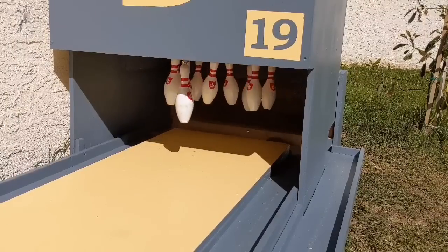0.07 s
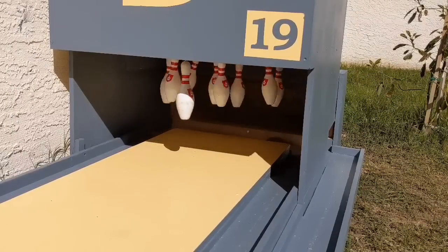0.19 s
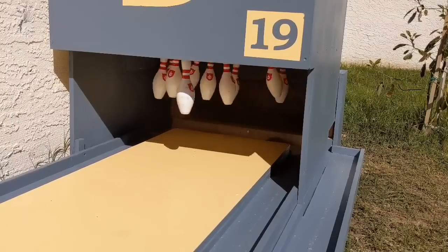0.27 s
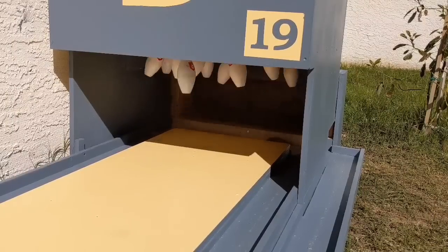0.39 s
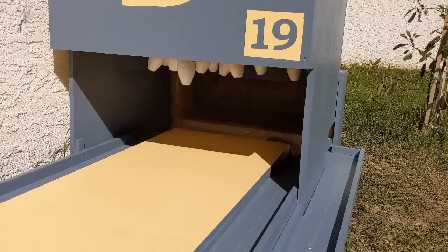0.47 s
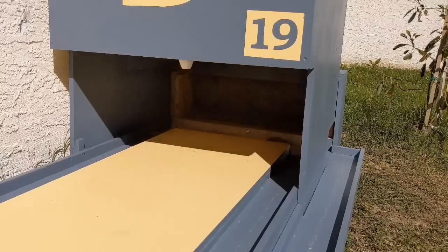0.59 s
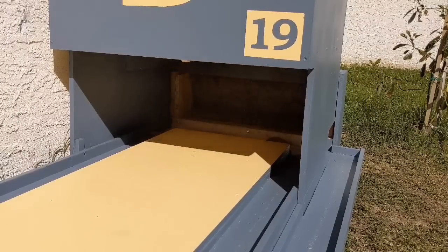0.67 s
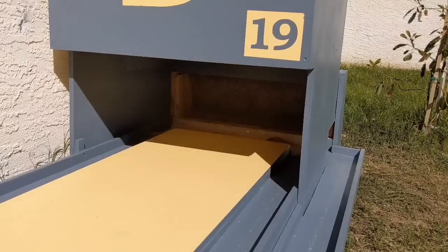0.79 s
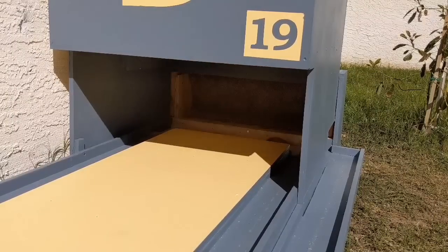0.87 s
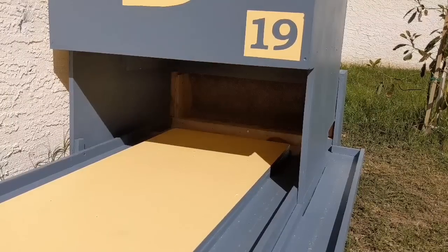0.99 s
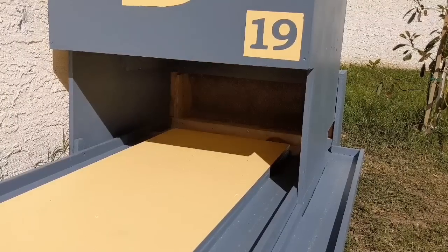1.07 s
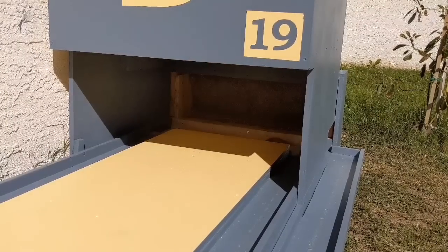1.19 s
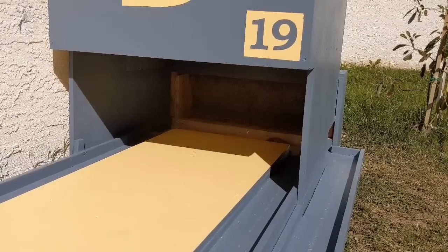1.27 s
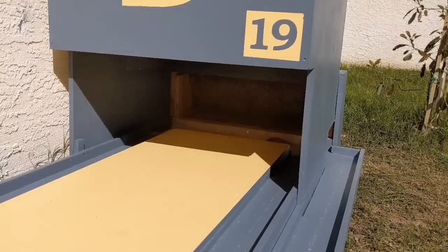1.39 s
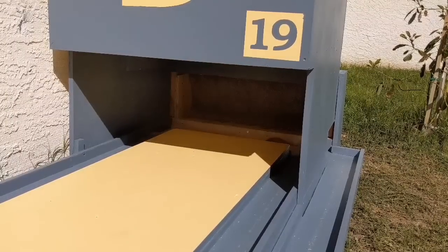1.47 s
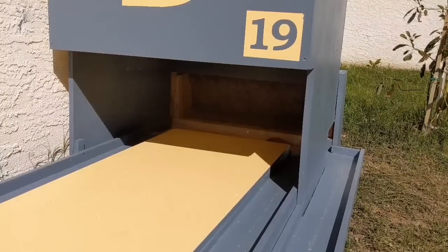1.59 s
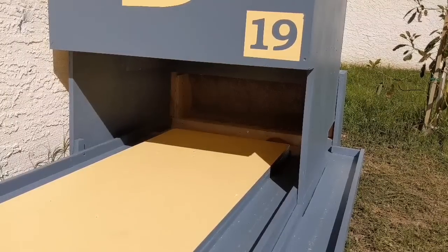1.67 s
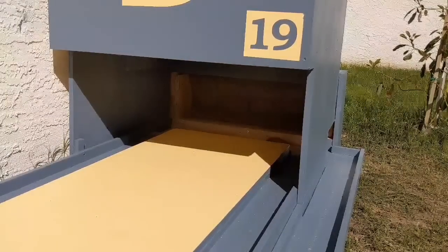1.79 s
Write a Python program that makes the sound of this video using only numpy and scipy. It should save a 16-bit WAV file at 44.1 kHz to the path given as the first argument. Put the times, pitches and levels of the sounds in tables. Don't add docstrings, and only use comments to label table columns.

```python
import sys
import numpy as np
from scipy import signal
from scipy.fft import rfft, irfft
from scipy.io import wavfile
from scipy.ndimage import uniform_filter1d

SR = 44100
rng = np.random.default_rng(int(sys.argv[2]) if len(sys.argv) > 2 else 0)


def magnitude_from_level(level_db):
    exponent = np.asarray(level_db, float) / 20
    return 10 ** exponent


def to_wav(sig):
    pcm = np.clip(np.atleast_2d(sig), -1, 1) * 32767
    pcm = np.round(pcm).astype(np.int16)
    wavfile.write(sys.argv[1], SR, pcm.T)


N = 81585

# pitch_hz, level_db (per Hz)
AIR_COLOUR = [(24, -23), (40, 2.5), (151, -3.5), (420, -14.5), (500, -18.5), (693, -22.5), (2420, -27.5),
              (15800, -47.5)]
# pitch_hz, width_hz, level_db
AIR_HUMPS = [(2335, 570, 4.5), (4030, 310, 6)]
# pitch_hz, likeness (0 to 1)
AIR_LIKENESS = [(60, 0.82), (600, 0.65), (1500, 0.023)]
# start_s, level_db
RATTLE_LEVEL = [
    (.322, -47),
    (0.328, -22.5),
    (.385, -24),
    (.44, -28),
    (.54, -31.5),
    (.62, -41.5),
    (.66, -27.5),
    (.70, -39),
    (0.799, -32),
    (0.952, -53),
]
# start_s, pitch_hz, level_db, brightness_db (per partial)
SQUEAK_PATH = [(1.015, 2370, -53, -2), (1.046, 2373, -46.5, 0.5), (1.065, 2395, -45, -2),
               (1.097, 2425, -35, -12), (1.113, 2447, -51, 1), (1.126, 2443, -43, -11.5),
               (1.143, 2490, -56, 1.5), (1.16, 2480, -41, -2.5), (1.182, 2504, -44.5, 0),
               (1.2, 2430, -47, -7.5), (1.251, 2486, -45, -20), (1.29, 2503, -60, -22),
               (1.355, 2507, -52.5, -22), (1.375, 2460, -60, -11)]
SQUEAK_PARTIALS = [3, -0.5, -1, -7.5]
# start_s, length_s, pitch_hz, level_db
STRING_CHIRPS = [(.40, 0.024, 4420, -21.5), (.45, 0.043, 3955, -25), (.50, 0.069, 4010, -30),
                 (.585, 0.033, 5130, -30.5), (.644, 0.015, 4877, -13), (.668, 0.013, 4560, -18.5),
                 (.684, 0.042, 4410, -34), (.722, 0.077, 5360, -31), (.355, 0.039, 5500, -37),
                 (.358, 0.015, 7340, -36), (.61, 0.013, 2060, -34.5), (.885, 0.065, 2440, -42.5),
                 (1.435, 0.011, 2620, -43), (1.395, 0.009, 2125, -38)]
# start_s, peak_db, pitch_hz
BOX_BOOMS = [(0.057, -19.5, 69.2), (0.2, -18.5, 62.4), (0.333, -13, 84.2), (0.401, -17.5, 72.3),
             (0.504, -4, 62.5), (0.546, -6, 57.2), (0.581, -26, 47.6), (0.655, -8.5, 90.8),
             (0.723, -5.5, 78), (0.798, -6, 70), (0.848, -8, 75.4), (0.937, -9, 74.2), (1.052, -10.5, 80.8),
             (1.108, -12.5, 84), (1.197, -10.5, 76.2), (1.29, -16.5, 65.4), (1.4, -23, 128.7),
             (1.43, -22, 62.3), (1.541, -19.5, 75), (1.587, -24.5, 126), (1.629, -22, 70)]
# start_s, peak_db, hardness_db (per octave)
BOARD_THUDS = [(0.195, -32, -4), (0.257, -23, 15.5), (0.309, -21, 11), (0.345, -17, 2), (0.45, -7.5, -3),
               (0.475, -0.5, 2), (0.497, -1.5, 1.5), (0.52, -4.5, 6), (0.545, -9, 4), (0.573, -12.5, 2),
               (0.644, -1, 3.5), (0.671, -9.5, -16), (0.713, -8, 9.5), (0.734, -4.5, 4.5), (0.772, -2, 4.5),
               (0.799, -9.5, 8), (0.83, -1, -8), (0.855, -11, 2.5), (0.917, -5.5, -10), (0.888, -9, -12),
               (0.986, -13.5, -13), (1.038, -14.5, -2.5), (1.083, -15, -5), (1.151, -11.5, -15),
               (1.189, -10.5, -11), (1.249, -16, -22), (1.339, -20, -7.5), (1.399, -20, -5),
               (1.484, -23, -26), (1.589, -25.5, -5.5), (1.62, -22.5, -3.5), (1.698, -24.5, -8)]
# pitch_hz, level_db
PANEL_TONES = [(165, -17), (228, -4), (275, -6), (320, 2), (372, 5), (420, -1.5), (495, 5), (597, -3.5),
               (700, -12), (835, -7), (1030, -15), (1300, -55)]
# start_s, peak_db, pitch_hz
PIN_KNOCKS = [(0.404, -5.5, 499), (0.654, -12, 453), (0.715, -10, 475), (0.918, -9.5, 492),
              (1.024, -4.5, 502), (1.152, -17, 508), (1.224, -16, 504.8), (1.244, -15.5, 496),
              (1.361, -12.5, 508), (1.543, -14.5, 509.5), (1.771, -30, 521)]
# ratio (to its pitch), level_db, t60_s (time to lose 60 dB)
PIN_TONES = [
    (1.002, 1, 0.11),
    (1.049, -9.5, 0.051),
    (1.4, -30.5, 0.11),
    (1.62, -13.5, 0.04),
    (2.02, -8, 0.029),
    (2.5, -16, 0.02),
]
# pitch_hz, level_db, t60_s
NECK_TONES = [(3381, -39, .09), (4393, -42, .12), (7273, -49, .1), (8280, -48, .1)]
# start_s, level_db, tilt_db (per octave), ring_hz, contact_s
PIN_CLACKS = [(0.0014, -33.5, -5.5, 2300, 0.042), (0.0885, -23, 3, 1130, 0.0061),
              (0.157, -22, 2, 3330, 0.0099), (0.196, -29, -2.5, 1960, 0.011),
              (0.255, -16.5, -2.5, 1100, 0.01), (0.274, -23.5, -5, 2170, 0.024),
              (0.3052, -20, -0.5, 1100, 0.0082), (0.3255, -2, 1, 3320, 0.005),
              (0.340, -13.5, -2, 2250, 0.0091), (0.358, -13.5, -6, 4200, 0.027),
              (0.390, -13.5, 6.5, 2400, 0.0089), (0.397, -6, -6.5, 3060, 0.01),
              (0.406, -15.5, 5, 8800, 0.013), (0.451, -17.5, -0.5, 3920, 0.018),
              (0.4803, -12.5, 2, 1570, 0.023), (0.5195, -14, 3.5, 3820, .012),
              (0.545, -18, -9, 2450, 0.0056), (0.5725, -16.5, -5.5, 4340, 0.011),
              (0.6354, -18, 2, 4160, 0.0096), (0.6465, -16, 6.5, 9800, 0.011),
              (0.671, -27, 3, 4400, 0.0099), (0.7145, -19, 4, 1490, 0.019), (0.7292, -14, 0.5, 3000, 0.011),
              (0.7735, -13, -2.5, 2030, 0.01), (0.7982, -25, 6, 4000, 0.0091),
              (0.8345, -18, 1, 2420, 0.0098), (0.862, -19, -9, 2380, 0.0088), (0.911, -32, -1, 2440, 0.02),
              (0.930, -32.5, 4, 4200, 0.0092), (0.986, -31, 1, 2900, 0.017),
              (1.0195, -18.5, -8.5, 1250, 0.012), (1.083, -32.5, -0.5, 1330, 0.036),
              (1.152, -35, -1, 2470, 0.032), (1.177, -34.5, 3, 3940, 0.021), (1.3987, -31, -2, 2100, 0.011),
              (1.622, -31, -4.5, 1240, 0.0085), (1.698, -34.5, -9, 1010, 0.0093),
              (1.775, -49, 12, 4400, .008)]
# pitch_hz, level_db (per Hz)
CLACK_COLOUR = [(410, -14), (700, -5.5), (1610, -12), (4400, -16.5), (4950, -20), (5420, -17.5),
                (6100, -25), (7220, -22.5), (15800, -39)]
# pitch_hz, left_minus_right_db
LEFT_LEAN = [(60, 4.5), (950, 2.5), (15000, 1.5)]

KNOCK_RISE_S = 0.009


def evened(x):
    return x / np.sqrt(np.mean(x ** 2) + 1e-20)


def peaked(x, db):
    return x * magnitude_from_level(db) / (abs(x).max() + 1e-12)


def read(points, hz):
    f, value = np.transpose(points)
    return np.interp(np.log(hz + 1), np.log(f + 1), value)


def add(mix, start_s, sound):
    part = mix[..., max(round(start_s * SR), 0):][..., :sound.shape[-1]]
    part += sound[..., :part.shape[-1]]


def flutter(samples, count):
    smooth = uniform_filter1d(rng.standard_normal(count), samples)
    return evened(uniform_filter1d(smooth, samples))


def ring(tones, t):
    return sum(magnitude_from_level(db - 60 * t / t60) * np.sin(2 * np.pi * hz * t) for hz, db, t60 in tones)


def ticks(count):
    ticks_per_s = 2700
    size, when, hiss = rng.exponential(1, count), rng.random(count), rng.standard_normal(count)
    hits = when < ticks_per_s / SR
    return hits * magnitude_from_level(1.1 * np.minimum(size, 4)) * np.sign(hiss) + hiss


def air():
    level_db, patch_db = -33.5, 3.8
    hz = np.fft.rfftfreq(1024, 1 / SR)
    a, b, c, d, patches = rng.standard_normal((N // 256 + 5, 513, 5)).T
    patches = uniform_filter1d(patches, 10, 0)
    patches = evened(uniform_filter1d(patches, 12, 1))
    same = read(AIR_LIKENESS, hz)[:, None]
    left = a + 1j * b
    right = same * left + np.sqrt(1 - same ** 2) * (c + 1j * d)
    colour = read(AIR_COLOUR, hz)
    for centre_hz, width_hz, db in AIR_HUMPS:
        colour += db * np.exp(-((hz - centre_hz) / width_hz) ** 2)
    spectrum = np.array([left, right]) * magnitude_from_level(colour[:, None] + patch_db * patches)
    sound = signal.istft(spectrum, nperseg=1024, noverlap=768)[1]
    return magnitude_from_level(level_db) * evened(sound[:, :N])


def rattle():
    low_cut_hz, flutter_db = 900, 4.2
    start_s, level_db = np.transpose(RATTLE_LEVEL)
    hz = np.fft.rfftfreq(N, 1 / SR)
    colour = magnitude_from_level(read(CLACK_COLOUR, hz)) * hz ** 2 / (hz ** 2 + low_cut_hz ** 2)
    both = np.array([evened(irfft(rfft(ticks(N)) * colour, N)) for ear in "LR"])
    level = np.interp(np.arange(N) / SR, start_s, level_db, -120, -120)
    return both * magnitude_from_level(level + flutter_db * flutter(200, N))


def squeak():
    waver, flutter_db = 0.004, 3.8
    start_s, pitch_hz, level_db, bright_db = np.transpose(SQUEAK_PATH)
    t = np.arange(N) / SR
    pitch = np.interp(t, start_s, pitch_hz) * (1 + waver * flutter(100, N))
    turns = np.cumsum(pitch) / SR
    bright = np.interp(t, start_s, bright_db)
    stack = np.zeros(N)
    for k, partial_db in enumerate(SQUEAK_PARTIALS):
        level = partial_db + k * bright + flutter_db * flutter(160, N)
        stack += magnitude_from_level(level) * np.sin(2 * np.pi * (k + 1) * turns)
    return stack * magnitude_from_level(np.interp(t, start_s, level_db, -120, -120))


def chirp(length_s, pitch_hz, level_db):
    sag, fuzz_hz, flutter_db = 0.036, 130, 4.46
    t = np.arange(4000) / SR
    hz = pitch_hz * (1 - sag * t / length_s) + fuzz_hz * flutter(60, 4000)
    swell = np.sin(np.pi * np.clip(t / length_s, 0, 1) ** 0.33)
    level = magnitude_from_level(level_db + flutter_db * flutter(100, 4000))
    return swell * level * np.sin(2 * np.pi * np.cumsum(hz) / SR)


def boom(peak_db, pitch_hz):
    rise_s, t60_s, flutter_db = 0.0049, 0.32, 4.9
    t = np.arange(14000) / SR
    swing = ring([(pitch_hz, 0, t60_s), (pitch_hz * 1.544, -7.5, t60_s)], t)
    rise = 1 - np.exp(-t / rise_s)
    return peaked(swing * magnitude_from_level(flutter_db * flutter(300, 14000)) * rise, peak_db)


def thud(peak_db, hardness_db):
    contact_s, trim_db = 0.044, -1
    panel_cycles = 39
    t = np.arange(7000) / SR
    tones = []
    for hz, db in PANEL_TONES:
        detune, spot = rng.standard_normal(2)
        level = db + 2.64 * spot + hardness_db * np.log2(hz / 400)
        tones.append((hz * (1 + 0.046 * detune), level, panel_cycles / hz))
    rub = rng.standard_normal(7000)
    push = rub * (1 - np.exp(-t / 0.0025)) * np.exp(-2 * t / contact_s)
    return peaked(signal.fftconvolve(push, ring(tones, t))[:7000], peak_db + trim_db)


def knock(peak_db, pitch_hz):
    flutter_db = 1.9
    t = np.arange(9000) / SR
    tones = [(ratio * pitch_hz, db, t60) for ratio, db, t60 in PIN_TONES] + NECK_TONES
    swell = np.sin(np.pi / 2 * np.minimum(t / KNOCK_RISE_S, 1)) ** 2
    return peaked(ring(tones, t) * magnitude_from_level(flutter_db * flutter(150, 9000)) * swell, peak_db)


def clack(level_db, tilt_db, ring_hz, contact_s):
    rise_s, tail, tail_t60_s, trim_db = 0.00026, 0.14, 0.037, -6
    ring_db, ring_octaves, same = 7, 0.28, 0.29
    t, hz = np.arange(8192) / SR, np.fft.rfftfreq(8192, 1 / SR)
    fade = np.exp(-(t / contact_s) ** 1.23) + tail * magnitude_from_level(-60 * t / tail_t60_s)
    shape = (1 - np.exp(-t / rise_s)) * fade
    colour = read(CLACK_COLOUR, hz) + tilt_db * np.log2((hz + 50) / 3000)
    colour += 2 * flutter(110, len(hz))
    colour += ring_db * np.exp(-(np.log2((hz + 1) / ring_hz) / ring_octaves) ** 2)
    floor_hz = np.clip(0.5 * ring_hz, 400, 2200)
    colour -= 9.1 * np.clip(np.log2(floor_hz / (hz + 1)), 0, 4)
    left, other = ticks(8192), ticks(8192)
    both = np.array([left, same * left + np.sqrt(1 - same ** 2) * other])
    return shape * evened(irfft(rfft(both) * magnitude_from_level(colour))) * magnitude_from_level(level_db + trim_db)


def box(x, echo_db, t60_s, same):
    taps = np.zeros((2, 10000))
    at = np.arange(20, 9980, 20) + rng.integers(0, 20, (2, 498))
    np.put_along_axis(taps, at, rng.choice([-1., 1.], at.shape), 1)
    taps[1] = same * taps[0] + np.sqrt(1 - same ** 2) * taps[1]
    taps *= magnitude_from_level(-60 * np.arange(10000) / SR / t60_s)
    wet = signal.fftconvolve(x, taps / np.linalg.norm(taps[0]), axes=1)[:, :N]
    return (x + magnitude_from_level(echo_db) * wet) / np.sqrt(1 + magnitude_from_level(echo_db) ** 2)


def scene():
    low, high, deep = np.zeros((2, N)), np.zeros((2, N)), np.zeros(N)
    high += squeak()
    for start_s, *row in PIN_KNOCKS:
        add(low, start_s - KNOCK_RISE_S / 2, knock(*row))
    for start_s, *row in BOARD_THUDS:
        add(low, start_s, thud(*row))
    for start_s, *row in BOX_BOOMS:
        add(deep, start_s, boom(*row))
    for start_s, *row in PIN_CLACKS:
        add(high, start_s, clack(*row))
    for start_s, *row in STRING_CHIRPS:
        add(high, start_s, chirp(*row))
    dull = box(low, echo_db=-8.5, t60_s=0.066, same=0.85)
    bright = box(high, echo_db=1, t60_s=0.066, same=0)
    return dull + bright + deep + rattle() + air()


def roll_off(x):
    return signal.sosfilt(signal.butter(12, 15940, fs=SR, output="sos"), x)


def record(dry):
    bass_cut_hz, top_hz = 44, 15880
    hz = np.fft.rfftfreq(N, 1 / SR)
    lean = read(LEFT_LEAN, hz) / 2
    edge = (hz < top_hz) / np.sqrt(1 + (bass_cut_hz / (hz + 1)) ** 10)
    limited = 0.92 * np.tanh(dry)
    return roll_off(irfft(rfft(limited) * magnitude_from_level([lean, -lean]) * edge, N))


dry = scene()
out = record(dry)
to_wav(out)
```